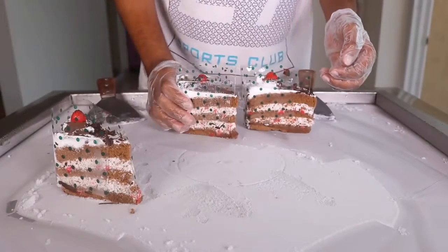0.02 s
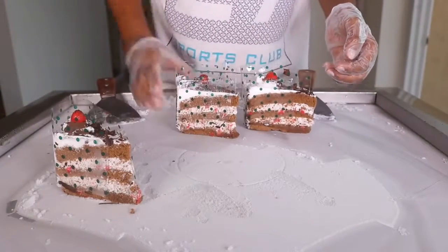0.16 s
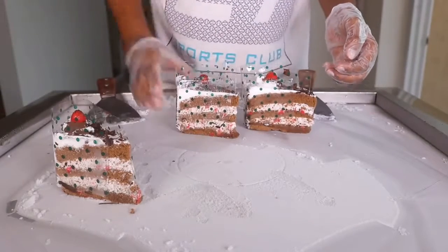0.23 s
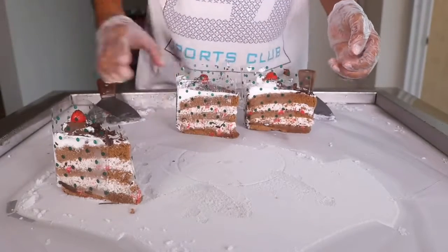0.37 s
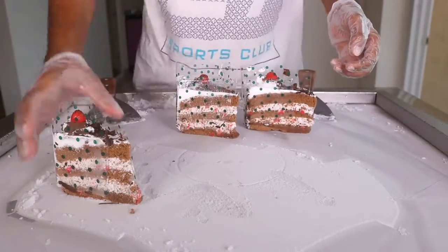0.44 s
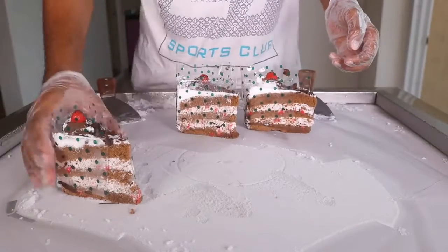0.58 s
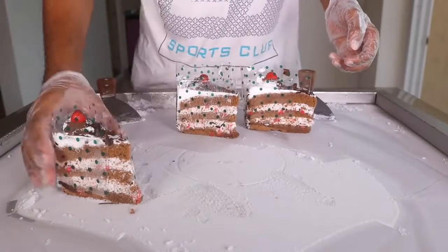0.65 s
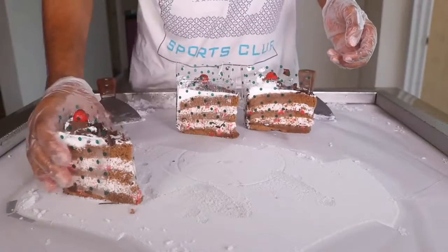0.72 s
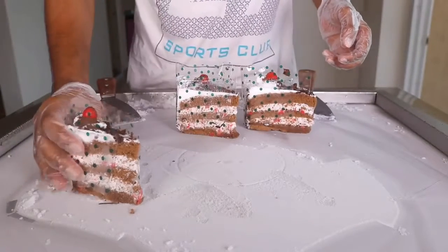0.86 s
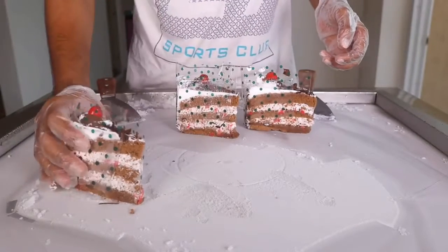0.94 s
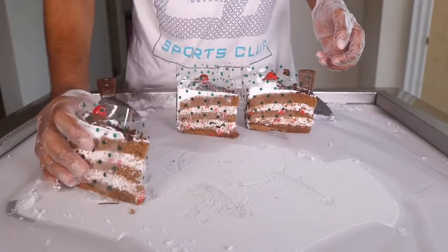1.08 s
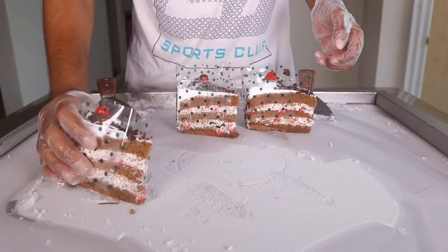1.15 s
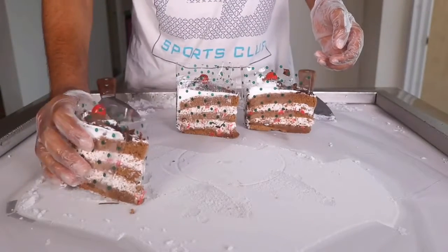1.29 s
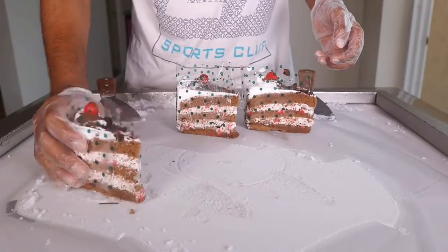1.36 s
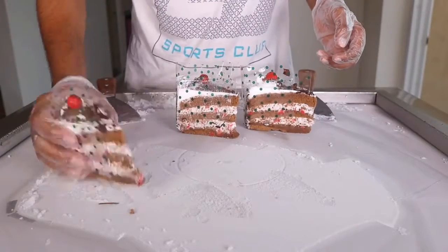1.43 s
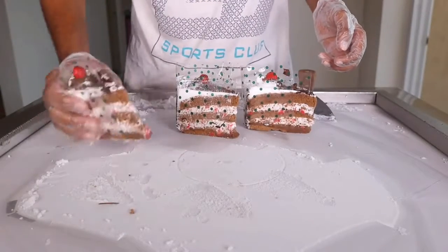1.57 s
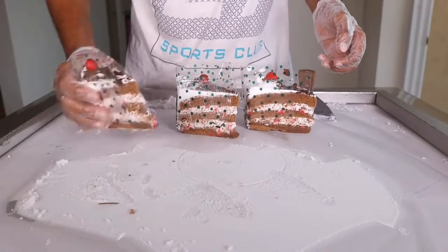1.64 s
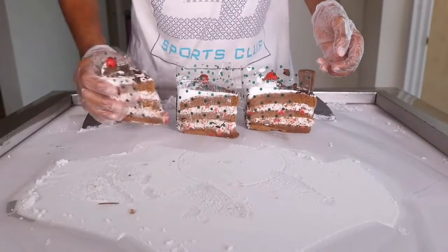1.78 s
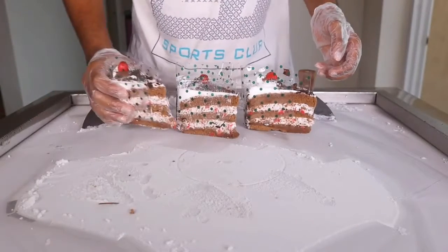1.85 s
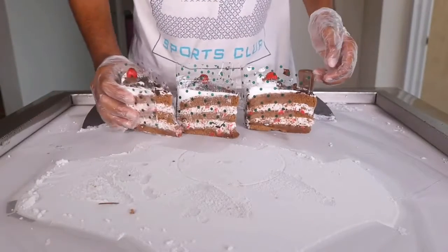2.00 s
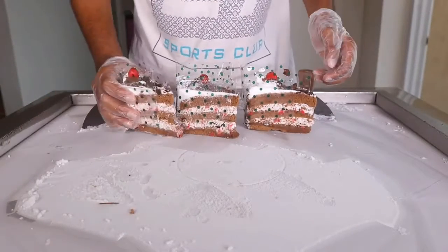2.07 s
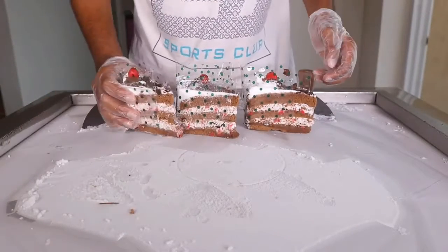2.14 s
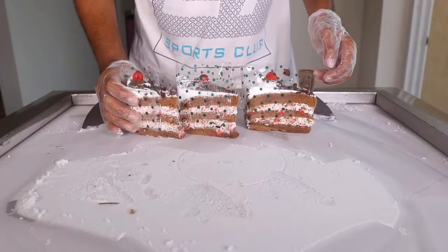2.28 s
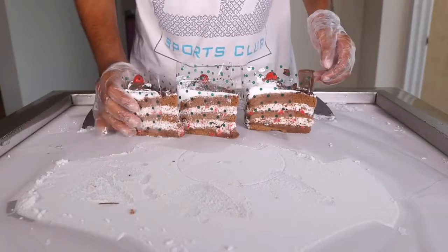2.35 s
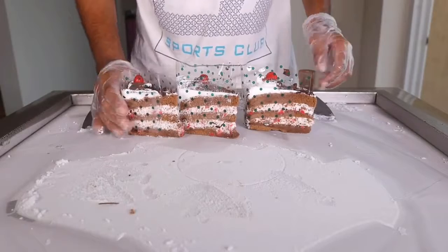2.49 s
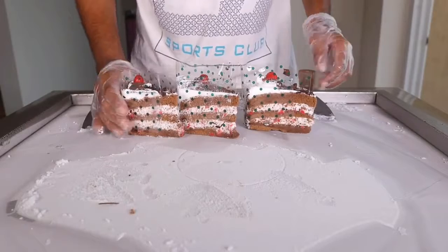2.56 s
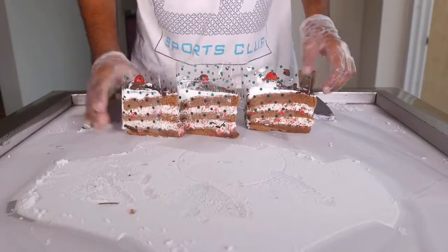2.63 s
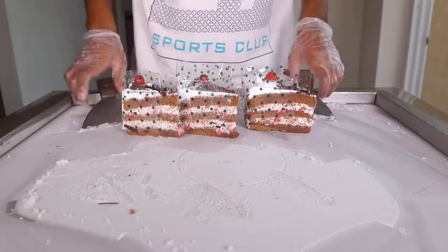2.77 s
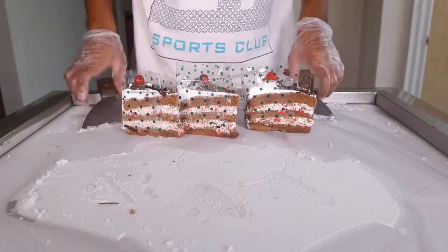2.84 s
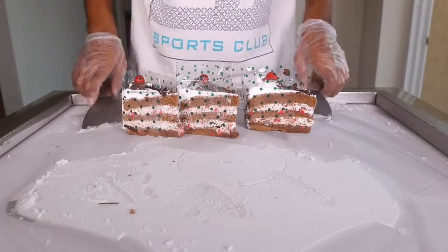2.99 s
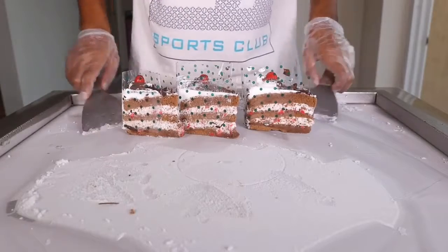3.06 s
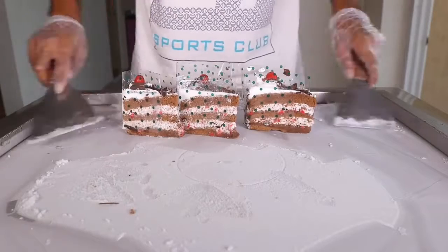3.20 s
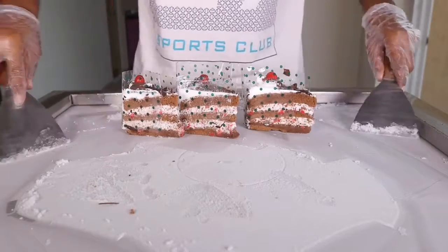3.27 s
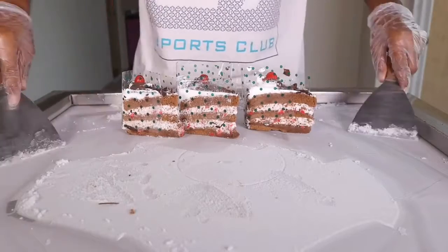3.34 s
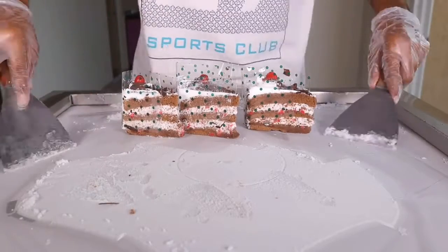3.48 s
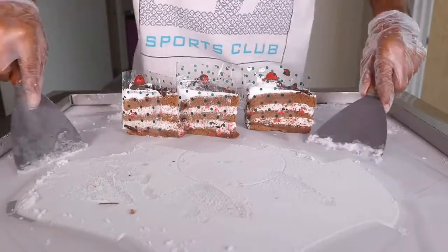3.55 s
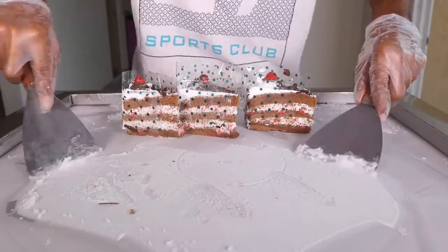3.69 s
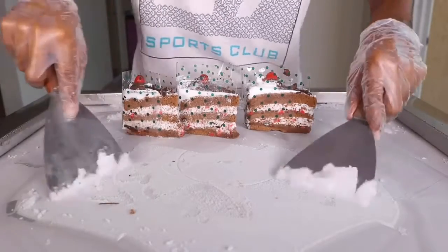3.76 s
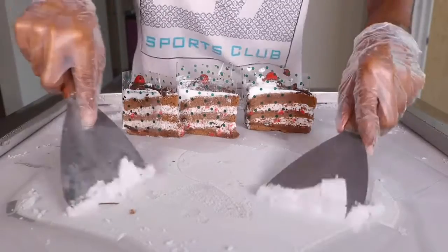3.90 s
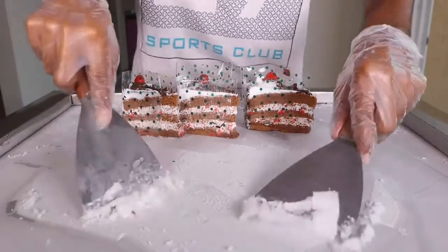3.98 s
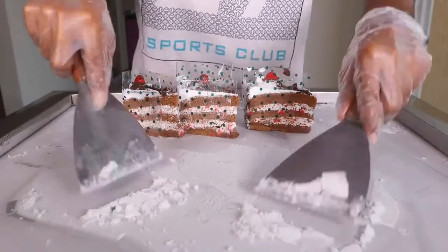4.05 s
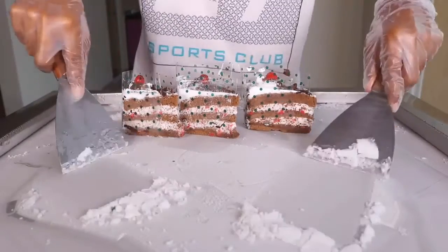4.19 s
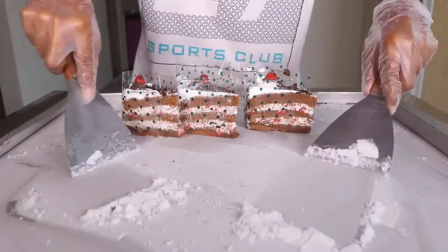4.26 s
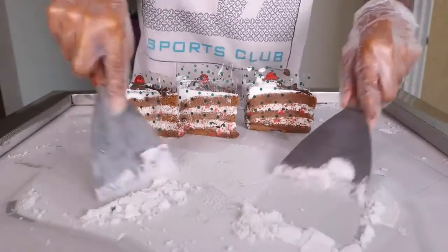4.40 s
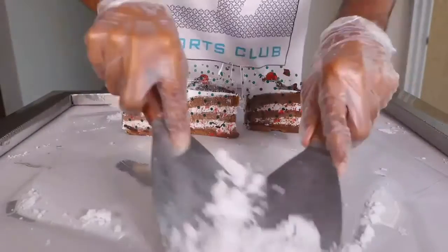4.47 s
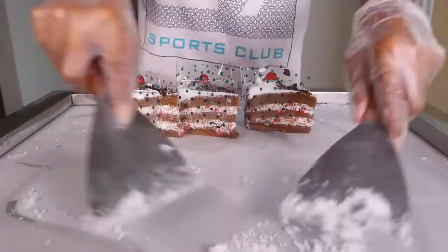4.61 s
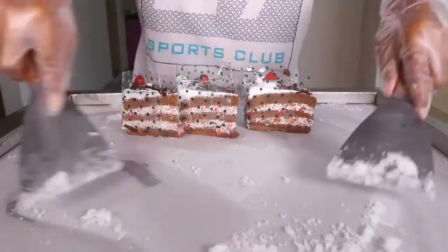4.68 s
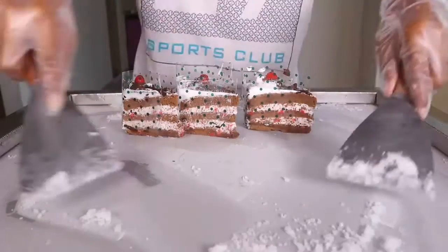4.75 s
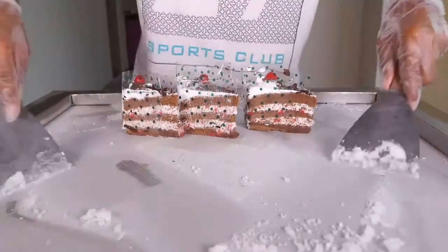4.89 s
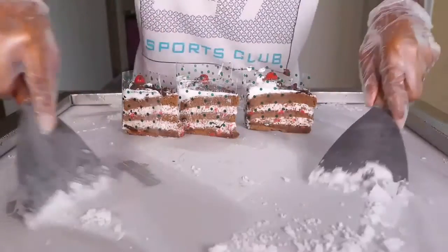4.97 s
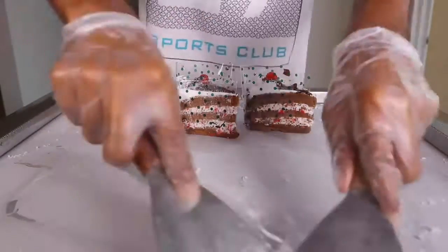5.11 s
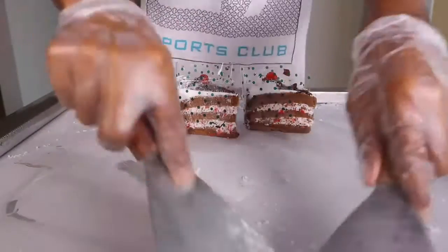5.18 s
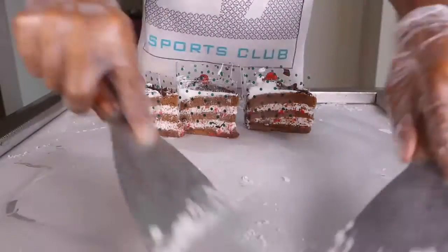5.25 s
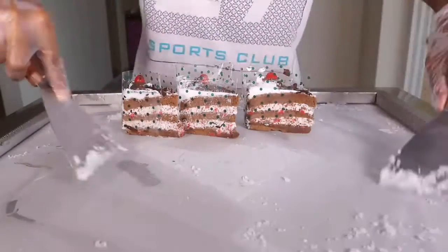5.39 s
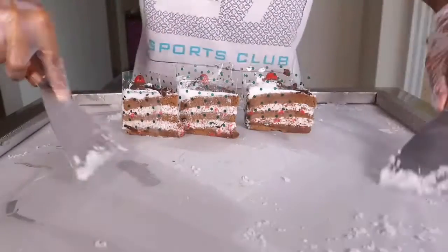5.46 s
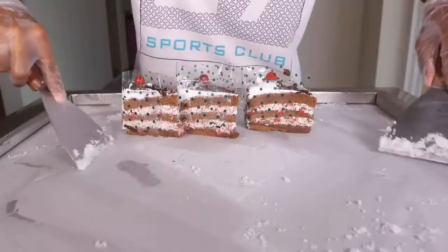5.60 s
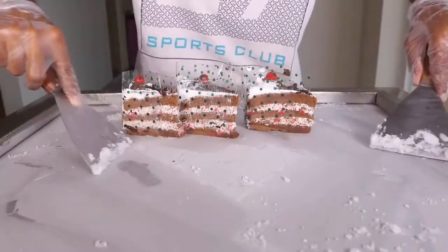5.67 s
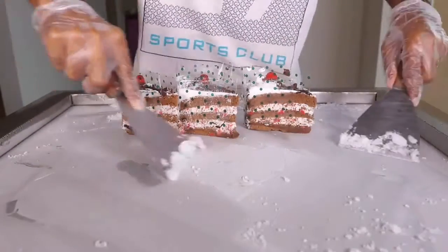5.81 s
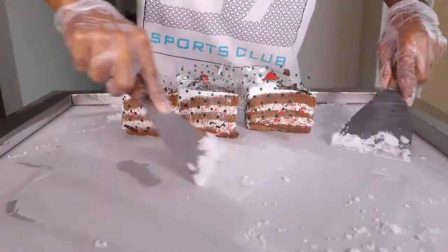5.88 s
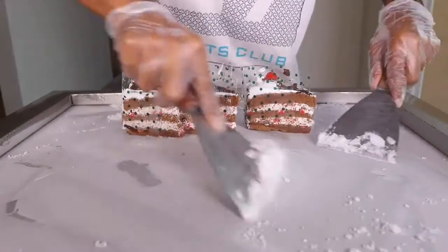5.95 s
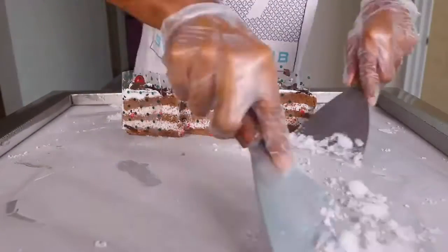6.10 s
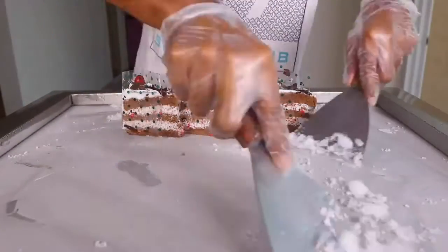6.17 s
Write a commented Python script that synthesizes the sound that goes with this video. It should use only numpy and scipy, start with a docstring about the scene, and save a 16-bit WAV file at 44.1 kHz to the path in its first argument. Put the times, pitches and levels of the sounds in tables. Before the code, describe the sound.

Close up in a small, hard-walled room, cooling-machine air and thin motor tones run constantly. Faint rustles and bumps come before metal blades hit an icy plate about halfway through. One longer, uneven scrape is followed by three shorter, harsher ones, each starting with a knock and breaking frost in dense crunching clicks with a brief metallic ring and short reflections. The small microphone sounds boxy and peaky.

```python
"""Spatulas on a frosted plate

Two steel spatulas land on a frosted cold plate and rasp across it in four strokes, close to a small camera.
Ice crystals break under the edges as dense clicks, which also ring the blades; landings and catches are bursts.
A small hard room answers. Behind it are soft handling noises and the freezer: fan hiss, motor whine and hums.
The camera's housing colours everything at the microphone with peaks and dips, and a top cut ends the treble."""
import sys
import numpy as np
from scipy import signal
from scipy.fft import rfft, irfft, next_fast_len
from scipy.io import wavfile

SR = 44100
rng = np.random.default_rng(int(sys.argv[2]) if len(sys.argv) > 2 else 0)


def unload_wav(signal):
    """Save mono or channel-first audio to the path in sys.argv[1] as 16-bit WAV at rate SR, clipped to [-1, 1]."""
    wavfile.write(
        sys.argv[1],
        SR,
        np.round(np.clip(np.atleast_2d(signal).T, -1, 1) * 32767).astype(np.int16),
    )


N = 275139
SIZE = next_fast_len(N + SR // 4, real=True)
HZ = np.arange(SIZE // 2 + 1) * SR / SIZE
T = np.arange(N) / SR

# strokes of the edges, from landing to lifting: start_s, crunch_db, lows_minus_crunch_db
STROKE_PATHS = [
    [(3.466, -31, 4), (3.546, -33.5, -7), (3.568, -44, 10), (3.58, -38.5, 3.5), (3.96, -31.5, 2),
     (3.978, -29.5, -1.5), (4.16, -30.5, -1), (4.2, -37.5, 0), (4.22, -50, 6)],
    [(4.463, -41, 4.5), (4.543, -37.5, 3.5), (4.633, -27, 2), (4.649, -28, 2), (4.675, -23.5, -7),
     (4.765, -24.5, 0), (4.8, -39, 7)],
    [(5.09, -46, 18), (5.106, -42, 8), (5.158, -28.5, 0.5), (5.352, -18, -8.5), (5.414, -24, 4.5),
     (5.45, -37, 7.5)],
    [(5.822, -27.5, -0.5), (5.86, -39, 2.5), (5.982, -33.5, -2), (6.052, -35.5, -2), (6.239, -25.5, -10)],
]
# blade angle of each stroke: moved_from_rasp_to_drone_db, middle_minus_crunch_db (at the even crunch level)
BLADE_ANGLES = [(-2.5, -12), (-1.8, -11.5), (-0.9, -14), (-1.6, -11.5)]
# bands of the scrape, in the order crunch, drone, rasp, middle rasp: low_hz, high_hz
SCRAPE_BANDS = [(5600, 16000), (950, 1850), (1850, 3900), (4100, 5600)]
# colour of the ice clicks: pitch_hz, level_db (per Hz)
ICE_COLOUR = [(900, 1.5), (1300, 7), (2300, 3.5), (3300, -1), (4800, -9), (6000, -3.5), (7000, -1),
              (9000, -5.5), (11000, -2.5), (16000, -2)]
# ringing modes of the steel blades: pitch_hz, level_db, t60_s
BLADE_MODES = [(990, -9, .05), (1230, -6, .05), (1440, -7, .06), (1775, -7, .07), (1955, -8, .07),
               (2165, -8, .1), (2425, -6, .07), (2600, -9, .06), (3140, -10, .05), (3450, -12, .06),
               (4380, -12, .05), (5420, -12, .06), (6090, -11, .07), (6525, -10, .1), (6643, -9, .12),
               (6806, -8, .1), (6964, -8, .1), (7125, -9, .1), (7207, -10, .1), (7450, -9, .1),
               (7705, -9, .1), (7944, -10, .1), (8614, -10, .12), (9064, -10, .12), (9312, -11, .12)]
# edge landings, then catches in mid-stroke: start_s, sharp_db, dull_minus_sharp_db, dull_centre_hz
EDGE_BLOWS = [(3.4482, -12, -3, 2470), (3.455, -20, 3, 1400), (4.4458, -18, 3, 2000),
              (5.0672, -24, -3, 3400), (5.070, -19, 8, 1190), (5.0762, -28, 11, 2200),
              (5.8055, -14.5, -8, 1870), (3.5351, -26.5, 3, 1380), (3.795, -32, -4, 2390),
              (4.4665, -29, 1, 2200), (4.626, -19, 3.5, 3140), (4.6504, -25, -3, 1230),
              (4.672, -18, -9, 2360), (4.7578, -14.5, 0, 1450), (5.1497, -26, -2, 2170),
              (5.256, -15.5, -9, 1295), (5.3594, -18.5, -11.5, 2430), (5.82, -24, -8, 1430),
              (6.156, -25, 0, 3450), (6.218, -15, -10, 2510)]
# soft handling, dull bumps and thin rustles: start_s, rise_s, dying_s (60 dB), low_hz, high_hz, level_db
HANDLING_NOISES = [(1.29, .005, .2, 8300, 11500, -57), (1.68, .06, 1.2, 180, 880, -48),
                   (2.96, .01, .15, 1000, 3000, -42), (3.17, .04, .4, 5000, 10500, -52),
                   (3.335, .005, .1, 1000, 3500, -40), (4.405, .004, .15, 150, 900, -45),
                   (4.43, .02, 1.4, 150, 700, -49), (5.76, .005, .1, 1000, 9000, -42)]
# fan air before the housing: pitch_hz, level_db (per Hz)
FAN_COLOUR = [(25, -23), (65, -26.5), (90, -10.5), (120, -16.5), (185, -9), (255, -21), (410, -16),
              (650, -15), (1300, -5), (2300, -10), (4500, -23.5), (7000, -18.5), (10000, -29.5),
              (16000, -10)]
# motor tones heard through the housing, some in families one shaft turn apart: pitch_hz, level_db (rms)
MOTOR_WHINE = [(646, -67.5), (1362, -63), (2164, -62), (2262, -64), (3196, -65), (3244, -67), (3392, -68),
               (6146, -71), (6195, -72), (6243, -72), (6292, -74), (6783, -71), (7767, -64), (8613, -76)]
# brief swells of the low hums: middle_s, length_s, which (0 lower, 1 upper), level_db
HUM_SWELLS = [(.57, .044, 0, -60), (.67, .22, 0, -59.5), (3.098, .13, 1, -63), (4.012, .1, 0, -59),
              (4.226, .05, 0, -62), (4.338, .17, 1, -65), (4.46, .084, 0, -60.5), (4.863, .089, 1, -62),
              (5.54, .09, 0, -62), (5.667, .078, 0, -61), (5.81, .07, 0, -63)]
# the lower and the upper hum: pitch_hz
HUM_PITCHES = [187, 410]
# peaks and dips of the cavity around the microphone: pitch_hz, width_hz, level_db
HOUSING_PEAKS = [(790, 150, -12), (1300, 400, 6), (2250, 400, 4), (3300, 500, 4), (6950, 550, 9),
                 (7850, 600, 4), (8270, 230, -12), (8900, 800, 3), (4020, 260, -7), (9680, 330, -17)]
# broad curve of the housing: pitch_hz, level_db
HOUSING_CURVE = [(20, 3), (9000, 11.5), (10300, 0), (11000, -8), (11600, -27), (13000, -33), (20000, -85)]

LANDING_S = .016  # each scrape starts this long before its first row, under the landing blow
LIFT_S = .19  # the scrape falls 60 dB in this time when the edge leaves the plate
EVEN_DB = -27.5  # crunch level at which the level-dependent shifts are zero
DRONE_LOSS_DB_PER_DB = .304  # the louder the crunch, the more of the lows pass from drone to rasp
MIDDLE_GAIN_DB_PER_DB = .2647  # the middle rasp grows faster than the crunch
DRONE_DB, RASP_DB = -6.5, -5.5  # against the lows
SHARP_LEAD_S, SHARP_RISE_S, SHARP_DYING_S = .001, .0008, .022
DULL_RISE_S, DULL_DYING_S = .00024, .0364
ROOM_T60_S, BLOW_WET_DB, RASP_WET_DB = .69, -7, -7
FAN_DB, PREAMP_DB, TOP_HZ = -39.5, -72.5, 15750


def scrape():
    """Breaking ice clicks directly and rings the blades; the edge judders, so the level flutters."""
    clicks = colour(crystals(per_s=7000, spread_db=-.5), read(ICE_COLOUR))
    both = heard(clicks) + undb(-7) * heard(ring(clicks, wander_db=9))
    judder_db = 1.2 * walk(70)
    parts = []
    for lo_hz, hi_hz in SCRAPE_BANDS:
        flutter = undb(judder_db + .67 * walk(40))  # shared judder, plus each band's own
        parts.append(flutter * heard(band(both, lo_hz, hi_hz)))
    return np.sum(stroke_gains() * parts, axis=0)


def stroke_gains():
    """Gains of crunch, drone, rasp and middle rasp while an edge touches the plate and as it lifts off."""
    out = np.zeros((4, N))
    for path, (lean_db, middle_db) in zip(STROKE_PATHS, BLADE_ANGLES):
        s, crunch_db, lows_db = np.transpose(path)
        lift = undb(-60 * np.clip(T - s[-1], 0, None) / LIFT_S)
        touching = (T > s[0] - LANDING_S) * lift
        crunch = np.interp(T, s, crunch_db)
        lows = np.interp(T, s, crunch_db + lows_db)
        excess = crunch - EVEN_DB
        shift = DRONE_LOSS_DB_PER_DB * excess - lean_db
        drone = lows + DRONE_DB - shift
        rasp = lows + RASP_DB + shift
        middle = crunch + middle_db + MIDDLE_GAIN_DB_PER_DB * excess
        out += touching * undb([crunch, drone, rasp, middle])
    return out


def crystals(per_s, spread_db):
    """Breaking ice: clicks at random times, of random sign; sizes lean exponentially, up to four spreads."""
    luck = rng.random((3, N))
    size_db = spread_db * np.minimum(-np.log(1 - luck[2]), 4)
    return (luck[0] < per_s / SR) * np.sign(luck[1] - .5) * undb(size_db)


def ring(x, wander_db):
    """Blade modes struck by x, neighbours in opposite phase; shares wander as the contact point shifts."""
    out = 0
    for k, (hz, db, t60) in enumerate(BLADE_MODES):
        pole = np.exp(2j * np.pi * hz / SR - np.log(1000) / (t60 * SR))
        strike = x * undb(db + wander_db * walk(14))
        feedback = [1, -2 * pole.real, abs(pole) ** 2]
        out = out + signal.lfilter([0, (-1) ** k * pole.imag], feedback, strike)
    return out


def blows():
    """Each blow is a fast burst of crushed ice; the dull part, pitched by where the edge lands, starts later."""
    grit = colour(crystals(per_s=31000, spread_db=-3), read(ICE_COLOUR))
    sharp = heard(band(grit, 5000, 10000))
    dull = heard(band(grit, 950, 4500))
    out = np.zeros(N)
    for s, db, dull_db, hz in EDGE_BLOWS:
        near = slice(int((s - .01) * SR), int((s + .15) * SR))
        body = signal.lfilter(*signal.iirpeak(hz, .9, fs=SR), dull[near])
        snap = burst(s - SHARP_LEAD_S, SHARP_RISE_S, SHARP_DYING_S, T[near])
        thud = burst(s, DULL_RISE_S, DULL_DYING_S, T[near])
        out[near] += undb(db) * snap * sharp[near]
        out[near] += undb(db + dull_db) * thud * body
    out = band(out, 900, 16000)  # the small blades radiate no bass
    return out + undb(-54) * ring(out, wander_db=3)


def burst(s, rise, dying, t=T):
    """Envelope that rises quickly from s while it decays by 60 dB per dying time."""
    t = np.clip(t - s, 0, None)
    return (1 - np.exp(-t / rise)) * 10 ** (-3 * t / dying)


def room(x, t60, wet_db):
    """A small hard room: the direct sound plus decaying noise after a short gap."""
    t = T[:SR // 2]
    tail = rng.standard_normal(len(t)) * 10 ** (-3 * t / t60) * (t > .004)
    tail = tail / np.sqrt(np.sum(tail ** 2))
    return x + undb(wet_db) * signal.fftconvolve(x, tail)[:N]


def handling():
    """Soft handling near the microphone: short swells of band-limited noise."""
    noise = rng.standard_normal(N)
    out = 0
    for s, rise, dying, lo_hz, hi_hz, db in HANDLING_NOISES:
        out = out + undb(db) * burst(s, rise, dying) * heard(band(noise, lo_hz, hi_hz))
    return out


def freezer():
    """Fan air as noise whose half-octave bands swell together slightly and flicker on their own."""
    air = rfft(heard(colour(rng.standard_normal(N), read(FAN_COLOUR))), SIZE)
    swell_db = .3 * walk(1.5)
    place = np.log2(HZ / 30 + 1e-9) * 2  # half octaves above 30 Hz
    fan = 0
    for k in range(19):
        share = np.clip(1 - abs(place - k), 0, 1)  # overlapping triangles
        fan = fan + undb(swell_db + 1.53 * walk(12)) * irfft(air * share, SIZE)[:N]
    return undb(FAN_DB) * fan


def tones():
    """Motor whine as sines with a slight wobble, and low hums that swell briefly and waver more."""
    out = 0
    for hz, db in MOTOR_WHINE:
        before_housing_db = db - np.interp(hz, HZ, HOUSING_DB)
        phase = 2 * np.pi * np.cumsum(hz + 2 * walk(5.5)) / SR
        out = out + undb(before_housing_db + 2 * walk(7.8)) * np.sin(phase)
    waver_db = 2.7 * walk(25)
    drift = np.cumsum(1 + .012 * walk(20)) / SR  # seconds, stretched and squeezed
    for s, length, which, db in HUM_SWELLS:
        swell = np.exp(-((T - s) / length * 2) ** 2)
        out = out + undb(db + waver_db) * swell * np.sin(2 * np.pi * HUM_PITCHES[which] * drift)
    return np.sqrt(2) * out  # sine levels are rms


def undb(db):
    """Amplitude gain of a level in dB."""
    return np.exp(np.asarray(db) * np.log(10) / 20)


def read(table):
    """Level in dB of a (pitch_hz, level_db) table at every frequency, straight on a log axis."""
    hz, db = np.transpose(table)
    return np.interp(np.log(HZ + 1), np.log(hz), db)


def colour(x, db):
    """Causal minimum-phase filter with the given dB curve: fold the cepstrum of the log gain."""
    c = irfft(np.log(undb(db)), SIZE)
    c[1:SIZE // 2] *= 2
    c[SIZE // 2 + 1:] = 0
    return irfft(rfft(x, SIZE) * np.exp(rfft(c)), SIZE)[..., :N]


def heard(x):
    """Scale so that the sound has rms 1 once it is through the housing."""
    power = 2 * np.sum(np.abs(rfft(x, SIZE) * undb(HOUSING_DB)) ** 2) / SIZE / N
    return x / np.sqrt(power)


def band(x, lo_hz, hi_hz):
    """Keep the sound between two frequencies."""
    return signal.sosfilt(signal.butter(4, [lo_hz, hi_hz], "band", fs=SR, output="sos"), x)


def walk(rate):
    """Random levels every 1 / rate s, joined by straight lines."""
    knots = rng.standard_normal(N // 400)
    return np.interp(T * rate, np.arange(len(knots)), knots)


# the microphone behind its small port: cavity peaks, cancellation dips, weak top octave
HOUSING_DB = read(HOUSING_CURVE)
for hz, width_hz, db in HOUSING_PEAKS:
    HOUSING_DB = HOUSING_DB + db * np.exp(-((HZ - hz) / width_hz * 2) ** 2)


def scene():
    """Steel on ice in its room, then handling, fan air and motor tones without added room."""
    steel = room(scrape(), ROOM_T60_S, RASP_WET_DB) + room(blows(), ROOM_T60_S, BLOW_WET_DB)
    return (steel + handling() + freezer() + tones())[None]


def record(dry):
    """The microphone: housing colour, faint amplifier hiss, steep top cut."""
    wet = colour(dry, HOUSING_DB) + undb(PREAMP_DB) * rng.standard_normal(dry.shape)
    return signal.sosfilt(signal.ellip(16, .3, 80, TOP_HZ, fs=SR, output="sos"), wet)


dry = scene()
out = record(dry)
unload_wav(out)
```